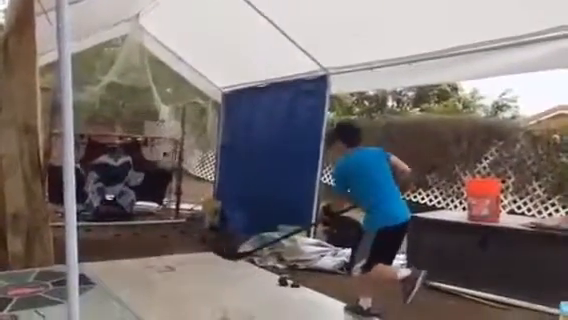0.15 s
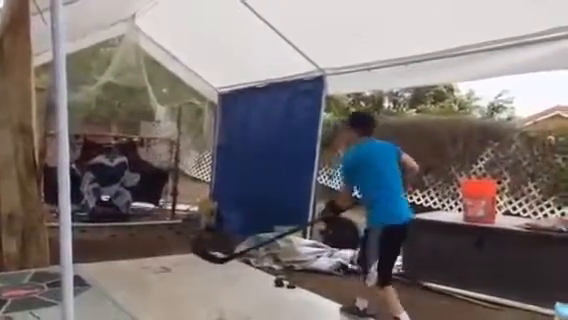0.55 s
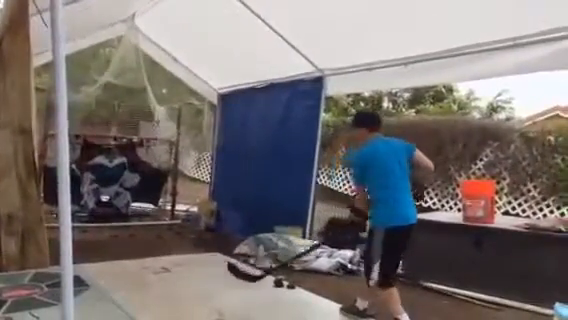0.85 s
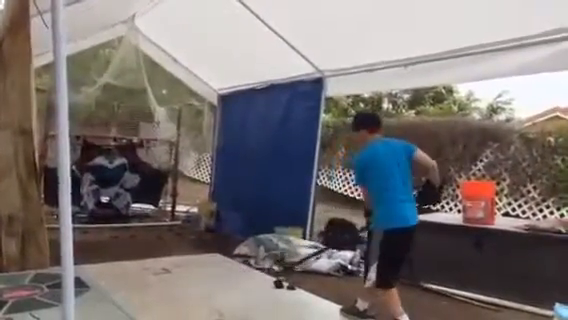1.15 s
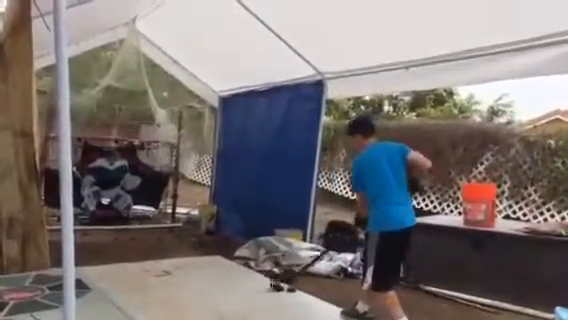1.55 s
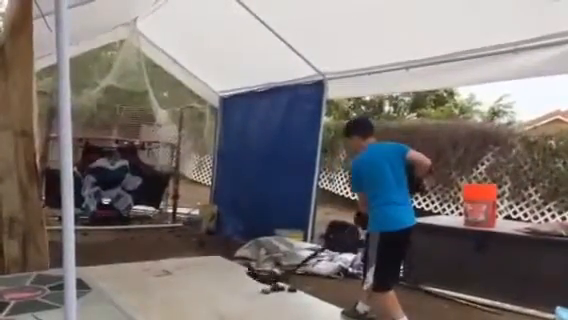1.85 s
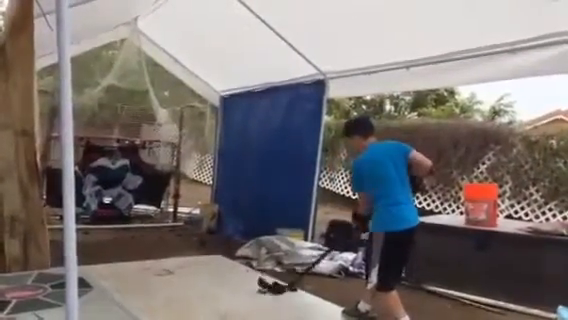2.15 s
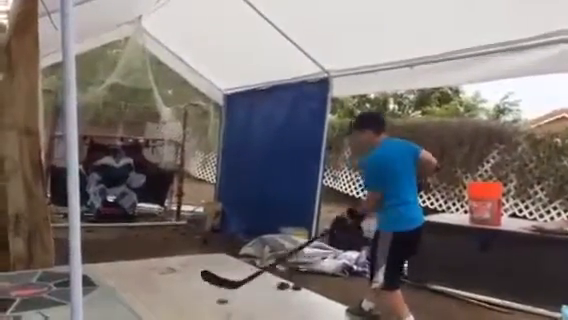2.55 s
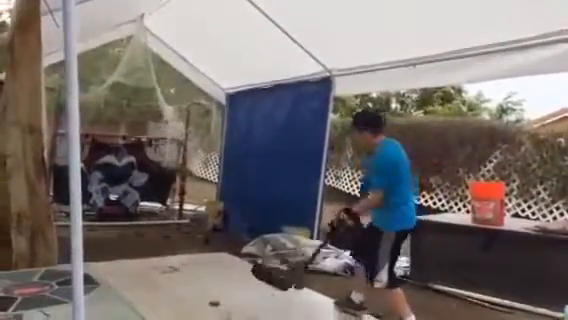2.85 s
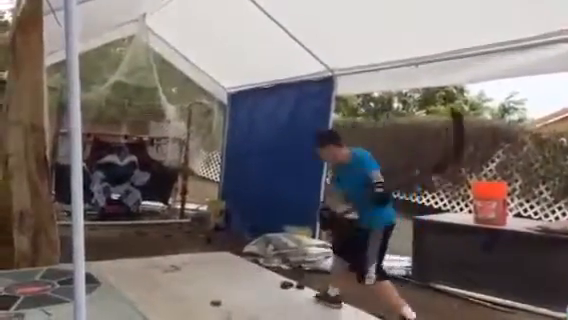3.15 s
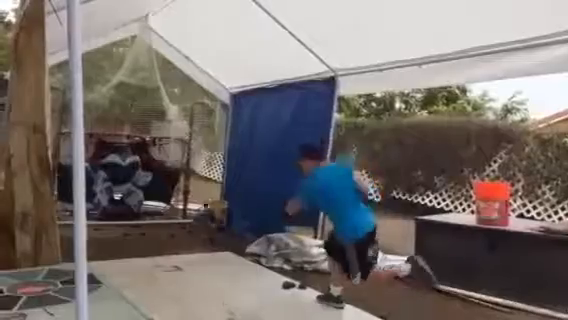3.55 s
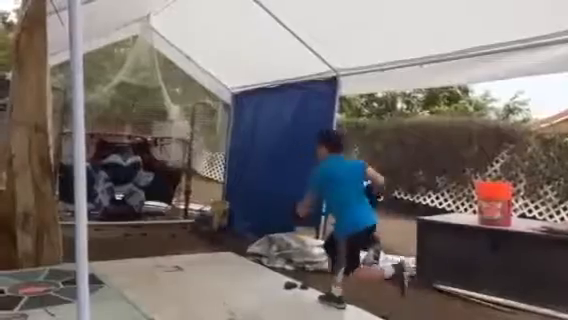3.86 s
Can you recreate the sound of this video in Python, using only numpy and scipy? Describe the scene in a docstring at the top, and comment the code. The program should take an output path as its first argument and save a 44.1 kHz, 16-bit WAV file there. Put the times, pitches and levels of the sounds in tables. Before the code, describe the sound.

Hockey stick knocking and dragging a puck over a plastic pad, ending in one hard slap.

```python
"""A backyard, under a canopy: a hockey stick taps and drags a puck over a plastic pad, then slaps it away.
Each impact excites damped modes of the pad, a clack of the blade and a bright crack; sliding friction
hisses, rubs and sets the pad rattling. Canopy and fence reflect each knock, far houses the shot.
Weight thumps on the ground, traffic rumbles and a distant engine hums.
The camera limits the shot and turns its gain down for a moment."""
import sys
import numpy as np
from scipy import signal
from scipy.fft import rfft, irfft, next_fast_len
from scipy.io import wavfile
from scipy.ndimage import map_coordinates

SR = 44100
rng = np.random.default_rng(int(sys.argv[2]) if len(sys.argv) > 2 else 0)


def unload_audio(sound):
    """Save the sound as a 16-bit wav file, at the path given as the first command line argument."""
    columns = np.transpose(np.atleast_2d(sound))
    # keep every value between -1 and 1, then stretch to whole-number steps
    steps = np.round(np.clip(columns, -1, 1) * 32767)
    wavfile.write(sys.argv[1], SR, steps.astype(np.int16))


N = 176400

# Noise spectra. Each row: frequency in Hz, relative spectral density in dB.
AIR_SPECTRUM = [(760, -38), (1300, -2), (2450, -12.5), (2950, -17.5), (5060, -20.5), (14300, -27.5),
                (15500, -30)]  # far hiss of road and leaves
TRAFFIC_SPECTRUM = [(12, -62.5), (20, -39), (54, -6.5), (163, 0), (201, -9), (252, -9.5), (280, -24),
                    (456, -20), (506, -24), (562, -22), (1300, -27.5), (1690, -64), (2860, -120)]
ROAR_SPECTRUM = [(120, -30), (200, 6), (300, 5.5), (420, -3.5), (700, -36.5)]  # the engine's noise
ECHO_SPECTRUM = [(500, 2), (1000, 12.5), (2000, 12), (3000, 1), (6000, -24)]
HISS_SPECTRUM = [(2350, -32), (4000, -7), (6890, -1.5), (8080, -5), (10400, -6), (14500, -9.5), (15500, -6)]
RUB_SPECTRUM = [(530, -30), (900, -1), (1380, -2), (1510, -4), (2150, -7), (2940, -12), (4500, -12.5),
                (5850, -43), (9900, -120)]
RATTLE_SPECTRUM = [(250, -34), (380, -15.5), (460, -2.5), (530, 0), (600, -6.5), (720, -14.5), (900, -11.5),
                   (1200, -50)]
BLADE_SPECTRUM = [(440, -48), (750, -1.5), (1150, 3), (1410, -4.5), (1530, -0.5), (1890, -5.5), (2050, -5),
                  (2200, -3), (2790, -11), (3600, -15), (4680, -32), (7920, -120)]
CRACK_SPECTRUM = [(1760, 4), (3000, -10.5), (3530, -1.5), (4400, 2.5), (11900, -9.5), (15000, -14.5)]
# Noise envelopes. Each row: time in seconds, level in dB.
AIR_ENVELOPE = [(0, -65), (.3, -71), (1.1, -68.5), (1.6, -70), (2.2, -67), (3.15, -72), (4, -72)]
TRAFFIC_ENVELOPE = [(0, -52.5), (.4, -51), (1, -50.5), (1.6, -51.5), (2.2, -49), (2.8, -49.5), (3.4, -51),
                    (4, -54.5)]
RATTLE_ENVELOPE = [(2.54, -47), (2.552, -58), (2.574, -47), (2.606, -61), (2.636, -40.5), (2.702, -45),
                   (2.836, -35), (2.864, -44.5), (2.94, -48.5), (2.962, -55), (2.986, -51), (3.08, -76),
                   (3.1, -65)]
# The engine's course. Each row: time in seconds, strongest partial in Hz, level in dB.
ENGINE_COURSE = [(0, 177, -65.5), (.75, 176.6, -55.5), (1.2, 167.4, -66.5), (2.4, 172.9, -62.5),
                 (2.8, 178.1, -49), (3.3, 176.9, -50), (3.55, 184.7, -47), (3.8, 205, -63.5), (4, 217, -52)]
# The engine's hum. Each row: frequency as a multiple of the strongest partial, relative level in dB.
ENGINE_PARTIALS = [(.375, -28.5), (.625, -9), (1, 0), (1.375, -7), (1.752, -16.5), (2.127, -21.5)]
# Weight landing on the ground. Each row: start in seconds, peak level in dB, pitch in Hz.
FOOTFALLS = [(0.962, -35.5, 163.4), (1.705, -30.5, 153), (2.363, -34, 145), (3.613, -30, 67)]
# Reverberation of canopy and fence. Each row: frequency in Hz, time to decay by 60 dB in seconds.
CANOPY_DECAY = [(300, 0.24), (1000, 0.17), (3000, 0.26), (8000, 0.27), (15000, .2)]
# Drags over the pad, one list apiece. Each row: time in seconds, hiss level in dB, rub level in dB.
DRAG_ENVELOPES = [
    [(0.47, -92, -81), (0.48, -93, -85), (0.49, -68, -65), (0.498, -61.5, -71), (0.562, -74, -72),
     (0.59, -61.5, -63), (0.614, -64, -66), (0.63, -57.5, -62), (0.686, -71, -68), (0.728, -54, -47.5),
     (0.76, -63.5, -59.5), (0.9, -79, -76)],
    [(2.2, -90, -88), (2.23, -63, -82), (2.264, -75, -84), (2.28, -69, -52)],
    [(2.335, -78, -72), (2.347, -59, -54), (2.399, -54, -46), (2.413, -50.5, -49.5), (2.457, -50, -44.5),
     (2.531, -49.5, -48.5), (2.545, -50, -44), (2.603, -41, -51.5), (2.679, -46, -48.5),
     (2.711, -41.5, -44.5), (2.789, -45, -47.5), (2.927, -55.5, -59), (3.001, -62, -62), (3.1, -82, -76)],
    [(3.27, -80, -75), (3.298, -59.5, -61), (3.362, -66.5, -60.5), (3.402, -57, -44), (3.424, -59, -64),
     (3.464, -52, -62), (3.54, -66, -64.5), (3.586, -66, -62.5), (3.612, -52, -34)],
]
# The pad's modes. Each row: multiple of the pad pitch, relative level in dB, multiple of the ring time.
PAD_MODES = [(1, 12, 1.1), (1.17, 1, .9), (.8, -11.5, .7)]
# Impacts of stick and puck. Each row: start in seconds, thud level in dB, pad pitch in Hz, clack and
# crack levels in dB before their boosts, clack tilt in dB per octave, pad ring time in seconds.
TAP_IMPACTS = [(0.709, -24, 433, -31, -58, -13.5, 0.055), (0.79, -39, 537, -52, -72, -10, 0.065),
               (0.964, -51, 334, -59.5, -60, 4, 0.069), (1.706, -20.5, 509, -29.5, -48.5, -2, 0.052),
               (1.755, -25, 454, -33.5, -53.5, -1.5, 0.075), (1.84, -20.5, 446, -29.5, -50.5, -5.5, 0.074),
               (1.862, -10, 491, -21, -36.5, -2.5, 0.054), (1.949, -14, 478, -22.5, -36.5, 1.5, 0.065),
               (1.97, -10.5, 493.6, -25, -33.5, 2, 0.043), (1.977, -16, 599, -20.5, -60, -2, 0.084),
               (1.993, -13.5, 486.4, -55, -65, -2, 0.035), (2.287, -21, 472, -34, -53, -3.5, 0.061),
               (2.344, -25, 457, -33, -52, -9.5, 0.07), (2.364, -13, 399.5, -22.5, -62, -3.5, 0.053),
               (2.468, -27, 463.6, -53, -45, -2, 0.061), (2.502, -27, 442, -38, -45.5, -1.5, 0.076),
               (3.376, -27.5, 495, -49, -52.5, -2, 0.051), (3.399, -39.5, 506, -39, -43, 6.5, 0.061)]
SHOT_IMPACTS = [(3.607, -25, 457, -31, -59.5, -0.5, 0.071), (3.619, -1.5, 480.4, -2, -14, -0.5, 0.055),
                (3.662, -17, 490, -17, -15.5, 0, 0.063), (3.686, -35, 462, -14.5, -21, 1.5, .07)]  # blade on pad, on puck, and what follows


def amp(db):
    """Decibels express an amplitude ratio logarithmically; this returns the ratio."""
    return 10 ** (np.asarray(db) / 20)


def unit(x):
    """Normalisation to an rms of 1."""
    return x / np.sqrt(np.mean(x ** 2) + 1e-20)


def along(points, hz):
    """Interpolation of (Hz, value) points on a logarithmic frequency axis."""
    freqs, values = np.transpose(points)
    return np.interp(np.log(hz + 1), np.log(freqs + 1), values)


def curves(rows, **ends):
    """Linear interpolation in time: one value per sample for each column after the first."""
    times, *columns = np.transpose(rows)
    return [np.interp(np.arange(N) / SR, times, column, **ends) for column in columns]


def wobble(rate):
    """Smooth random modulation: a spline through rate Gaussian knots a second."""
    return map_coordinates(rng.standard_normal(int(N * rate / SR) + 4), [np.arange(N) * rate / SR])


def coloured(x, spectrum):
    """Filtering as multiplication of the spectrum by a curve of (Hz, dB) points."""
    size = next_fast_len(len(x) + 4096)
    gain = amp(along(spectrum, np.fft.rfftfreq(size, 1 / SR)))
    return irfft(rfft(x, size) * gain, size)[:len(x)]


def rush(spectrum, grain_db, grain_rate):
    """Random amplitude modulation gives a coloured noise of rms 1 its grain."""
    return unit(coloured(rng.standard_normal(N) * amp(grain_db * wobble(grain_rate)), spectrum))


def burst(spectrum, t60, t):
    """Exponential decay of a coloured noise, by 60 dB in t60 seconds."""
    return unit(coloured(rng.standard_normal(len(t)), spectrum)) * amp(-60 * t / t60)


def ring(modes, t):
    """Free vibration is a sum of damped modes, here varied a little at each strike; peak 1."""
    x = sum(amp(db + rng.normal(0, 0.71) - 60 * t / t60)
            * np.sin(2 * np.pi * hz * rng.normal(1, 0.019) * t) for hz, db, t60 in modes)
    return x / np.abs(x).max()


def street():
    """Broadband noise: road and leaves hiss far away above a slowly swelling traffic rumble."""
    air = amp(curves(AIR_ENVELOPE)[0]) * rush(AIR_SPECTRUM, grain_db=1.0, grain_rate=220)
    traffic_db = curves(TRAFFIC_ENVELOPE)[0] + 1.3 * wobble(1.1)
    return air + amp(traffic_db) * rush(TRAFFIC_SPECTRUM, grain_db=1.2, grain_rate=150)


def engine():
    """A nearly periodic source: partials follow one unsteady pitch over a low roar."""
    hz, level_db = curves(ENGINE_COURSE)
    phase = 2 * np.pi * np.cumsum(hz * (1 + 0.0065 * wobble(5.33))) / SR
    hum = sum(amp(db + 1.56 * wobble(5.08)) * np.sin(multiple * phase + rng.uniform(0, 2 * np.pi))
              for multiple, db in ENGINE_PARTIALS)
    roar = amp(-5.5) * rush(ROAR_SPECTRUM, grain_db=3.8, grain_rate=40)
    return amp(level_db) * (np.sqrt(2) * hum + roar)


def houses(level_db=-37.5, t60=1.32, rise_s=.05):
    """Diffuse reflection from far houses: a dull noise swells after the loudest clack and decays."""
    shot_s = max(SHOT_IMPACTS, key=lambda row: row[3])[0]
    t = np.maximum(np.arange(N) / SR - shot_s, 0)
    envelope = amp(level_db - 60 * t / t60) * (1 - np.exp(-(t / rise_s) ** 2))
    return envelope * rush(ECHO_SPECTRUM, grain_db=1, grain_rate=32)


def steps(t60=0.12):
    """Weight landing on the ground excites two low, heavily damped modes."""
    out, t = np.zeros(N + SR), np.arange(SR // 5) / SR
    for start, db, hz in FOOTFALLS:
        out[round(start * SR):][:len(t)] += amp(db) * ring([(hz, 0, t60), (1.68 * hz, -4, t60)], t)
    return out[:N]


def canopy(delay_s=.003):
    """Reverberation of canopy and fence: a random response of energy 1, each band with its own decay."""
    hz, t, bands = signal.stft(rng.standard_normal(SR // 2), SR, nperseg=256)
    decay = amp(-60 * t / along(CANOPY_DECAY, hz)[:, None])
    tail = signal.istft(bands * decay, SR, nperseg=256)[1]
    return np.pad(tail, (round(delay_s * SR), 0)) / np.linalg.norm(tail)


def drags():
    """Sliding friction: blade and puck hiss and rub over the plastic and force the pad to rattle."""
    silent_ends = dict(left=-120, right=-120)
    hiss_gain, rub_gain = np.sum([amp(curves(drag, **silent_ends)) for drag in DRAG_ENVELOPES], axis=0)
    rattle_gain, = amp(curves(RATTLE_ENVELOPE, **silent_ends))
    hiss = hiss_gain * amp(1.15 * wobble(60)) * rush(HISS_SPECTRUM, grain_db=1.0, grain_rate=800)
    rub = rub_gain * amp(1.4 * wobble(45)) * rush(RUB_SPECTRUM, grain_db=-2.5, grain_rate=1800)
    rattle = rattle_gain * rush(RATTLE_SPECTRUM, grain_db=1.5, grain_rate=43)
    return hiss + rub + rattle


def impacts(rows, canopy_db):
    """Impulsive excitation: the pad thuds, the blade clacks, a crack sounds and the canopy answers."""
    clack_boost_db, crack_boost_db, low_cut_hz = 2, 2.5, 299
    thud_attack_s, clack_attack_s = 0.001, 0.00044
    out, t = np.zeros(N + SR), np.arange(SR // 8) / SR
    thud_rise = 1 - np.exp(-t / thud_attack_s)
    clack_rise = np.minimum(t / clack_attack_s, 1) ** 2
    for start, thud_db, pad_hz, clack_db, crack_db, tilt_db, ring_s in rows:
        modes = [(multiple * pad_hz, db, stretch * ring_s) for multiple, db, stretch in PAD_MODES]
        blade = [(hz, db + tilt_db * np.log2(hz / 1500)) for hz, db in BLADE_SPECTRUM]
        thud = amp(thud_db) * ring(modes, t) * thud_rise
        clack = amp(clack_db + clack_boost_db) * burst(blade, t60=0.031, t=t) * clack_rise
        crack = amp(crack_db + crack_boost_db) * burst(CRACK_SPECTRUM, t60=0.03, t=t)
        # The thud stirs the canopy less; clack and crack each get a tail of their own colour and energy.
        reverb = amp(-3) * signal.fftconvolve(thud, canopy())[:SR // 2]
        for part, spectrum in (clack, blade), (crack, CRACK_SPECTRUM):
            tail = coloured(canopy(), spectrum)[:SR // 2]
            reverb += tail * np.linalg.norm(part) / np.linalg.norm(tail)
        out[round(start * SR):][:len(reverb)] += amp(canopy_db) * reverb
        out[round(start * SR):][:len(t)] += thud + clack + crack
    return signal.sosfilt(signal.butter(3, low_cut_hz, "high", fs=SR, output="sos"), out[:N])


def scene():
    """Superposition: the pressures of all sources add at one microphone."""
    taps = impacts(TAP_IMPACTS, canopy_db=-1)
    shot = impacts(SHOT_IMPACTS, canopy_db=4)
    return (taps + shot + houses() + steps() + drags() + engine() + street())[None]


def smooth(x, seconds):
    """Exponential averaging by a one-pole filter with the given time constant."""
    keep = np.exp(-1 / (seconds * SR))
    return signal.lfilter([1 - keep], [1, -keep], x)


def record(dry):
    """Dynamic compression: a fast limiter, a slower gain that follows it, soft clipping, a band limit."""
    threshold_db, duck_share, ceiling, top_hz = -15, .8, .85, 15100
    level_db = 10 * np.log10(smooth(dry[0] ** 2, seconds=0.002) + 1e-12)
    limiter_db = np.minimum(0, threshold_db - level_db)
    duck_db = duck_share * smooth(limiter_db, seconds=0.16)
    limited = dry[0] * amp(limiter_db + duck_db)
    clipped = limited / (1 + np.abs(limited / ceiling) ** 4) ** .25
    return coloured(clipped, [(top_hz, 0), (top_hz + 100, -70)])[None]


dry = scene()
out = record(dry)
unload_audio(out)
```